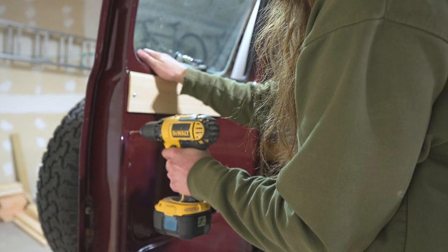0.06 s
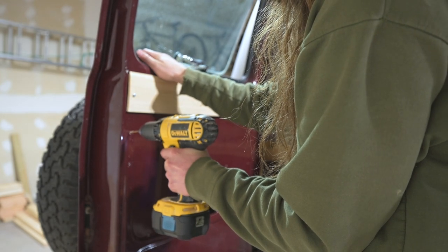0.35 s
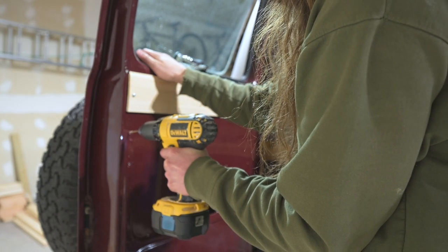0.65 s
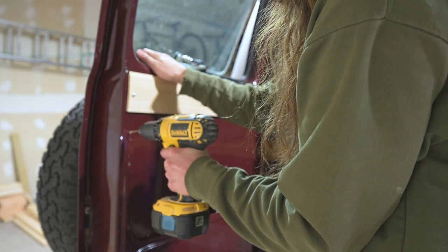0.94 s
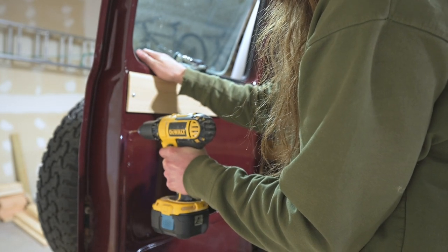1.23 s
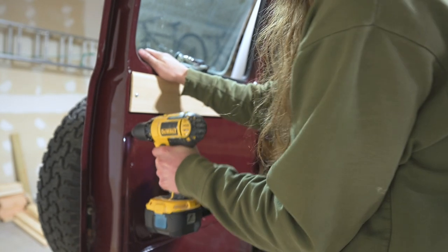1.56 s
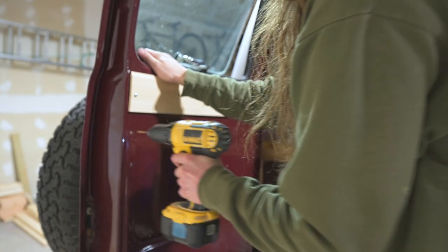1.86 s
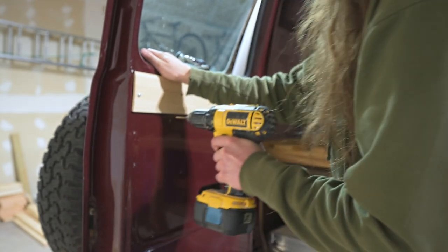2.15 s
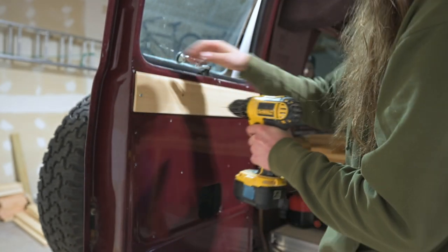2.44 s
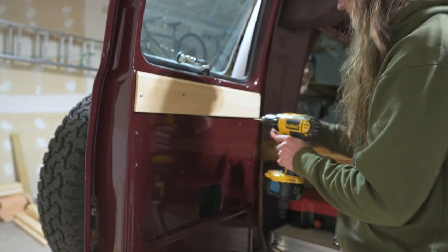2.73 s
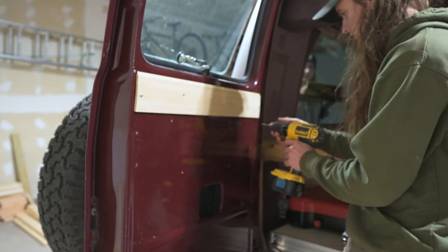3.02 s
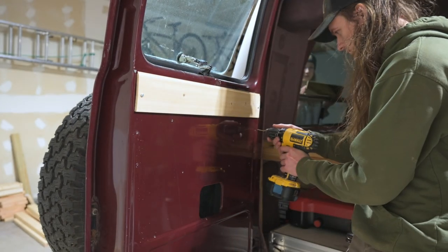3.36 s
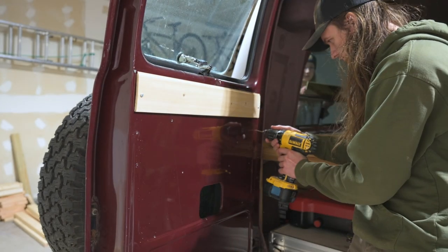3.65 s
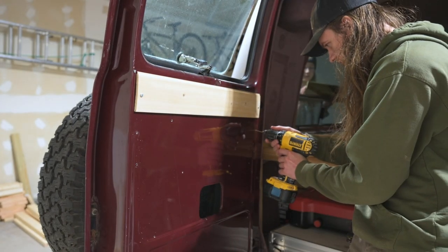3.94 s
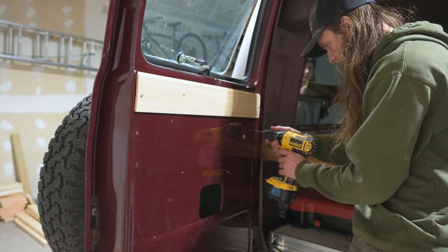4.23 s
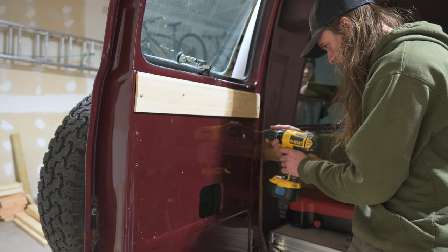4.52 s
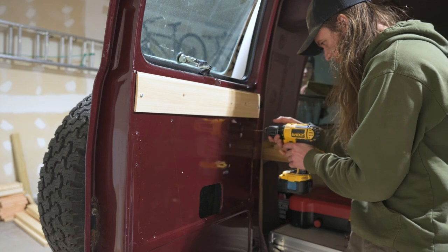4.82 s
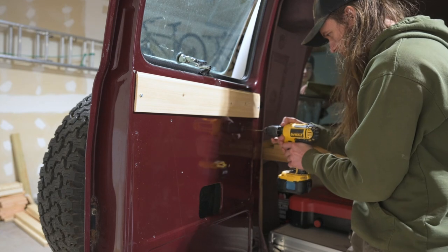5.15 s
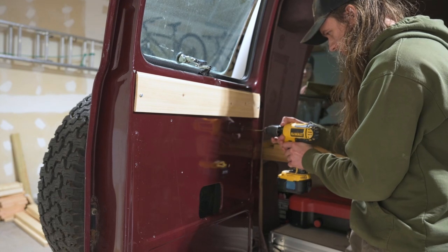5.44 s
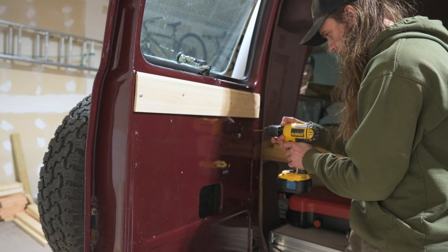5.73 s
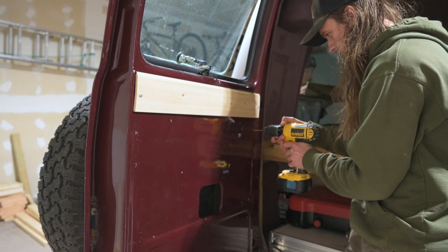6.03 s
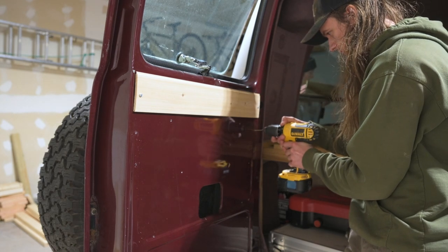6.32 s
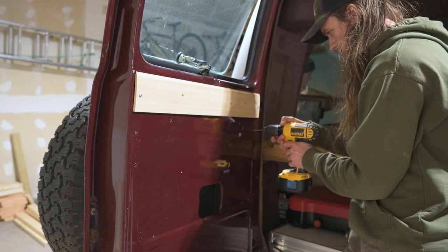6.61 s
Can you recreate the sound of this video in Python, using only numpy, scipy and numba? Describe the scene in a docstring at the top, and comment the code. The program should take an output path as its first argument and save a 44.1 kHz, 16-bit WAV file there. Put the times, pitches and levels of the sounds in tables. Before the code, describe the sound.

Two bursts of a cordless drill squealing and scraping through a metal van door, separated by light knocks and clicks.

```python
"""A cordless drill bores twice into the sheet-metal door of a van in a garage. Its motor and gears whine
over rattle and fan air. In the first hole the bit squeals and chatters through the panel, then the brake
clacks; in the second it scrapes on. Between the holes the door and its wooden trim are knocked and rubbed.
A limiter holds the loud drill down and lets the room's echo swell up when it stops."""
import sys
import numpy as np
from scipy import signal
from scipy.fft import rfft, irfft
from scipy.io import wavfile
from scipy.ndimage import uniform_filter1d
from numba import njit

SR = 44100
rng = np.random.default_rng(int(sys.argv[2]) if len(sys.argv) > 2 else 0)


def generate_wav(signal):
    """Clip the signal to [-1, 1] and save it as 16-bit WAV at the path in sys.argv[1]."""
    frames = np.transpose(np.atleast_2d(signal))
    scaled = np.clip(frames, -1, 1) * 32767
    pcm = np.round(scaled).astype(np.int16)
    wavfile.write(sys.argv[1], SR, pcm)


N = 298998
T = np.arange(N) / SR
HZ = np.maximum(np.arange(N // 2 + 1) * SR / N, 1)


def undb(db):
    """Turn decibels into a gain."""
    return 10 ** (np.asarray(db) / 20)


def unit(x):
    """Scale a sound to an average (rms) size of 1."""
    return x / np.sqrt(np.mean(x ** 2))


def over_hz(points, hz):
    """Read between (frequency, value) points, giving each octave equal room."""
    f, value = np.transpose(points)
    return np.interp(np.log(hz), np.log(f), value)


def shape(x, gain):
    """Give each frequency its own gain."""
    return irfft(rfft(x) * gain, N)


def band(x, low_hz, high_hz, order=2):
    """Keep what lies between two frequencies."""
    edges = [low_hz, min(high_hz, SR / 2 - 1)]
    return signal.sosfilt(signal.butter(order, edges, "band", fs=SR, output="sos"), x)


def convolve(x, response):
    """Let every sample of a sound set off the same echo or ring."""
    return signal.fftconvolve(x, response)[:N]


def noise(samples=N):
    """Plain white hiss."""
    return rng.standard_normal(samples)


def wobble(rate):
    """A random drift, about 1 in size, that turns rate times a second."""
    return 1.2 * np.interp(T * rate, np.arange(N), noise())


def gate(start, end):
    """On between two times, with 4 ms fades outside them."""
    return np.clip(1 + np.minimum(T - start, end - T) / .004, 0, 1)


def swells(rows):
    """A gain that rises to a peak and falls away for each row."""
    return sum(undb(db) * np.interp(T, [start, peak, end], [0, 1, 0]) for start, peak, end, db in rows)


def add(out, start, sound):
    """Mix a sound in at a given time."""
    i = int(start * SR)
    out[i:i + len(sound)] += sound[:N - i]


# the tone of the quiet garage: f/Hz, level/dB
ROOM_TONE = [(20, -17), (60, -4), (120, -3), (300, 3.5), (1000, -7), (3000, -13), (8000, -15), (15500, -22)]

def still_air(level_db=-53):
    """The faint, low hush of the room."""
    return undb(level_db) * unit(shape(noise(), undb(over_hz(ROOM_TONE, HZ))))


# how long the garage echoes: f/Hz, time to fade by 60 dB/s
ECHO_TIMES = [(60, 1.17), (250, 1.16), (1000, 1.02), (2500, 0.82), (5000, 0.6756), (8000, 0.44),
              (12000, 0.34), (16000, 0.56)]

def garage(x, echo_db=-6, gap_s=0.0048):
    """The walls add a wash of echoes whose high notes die first."""
    hz, t, spectrum = signal.stft(noise(2 * SR), SR, nperseg=256)
    decay = np.exp(-np.log(1000) * t / over_hz(ECHO_TIMES, hz + 1)[:, None])
    tail = signal.istft(spectrum * decay * np.clip(t / gap_s - 1, 0, 1), SR)[1]
    return x + undb(echo_db) * convolve(x, tail / np.sqrt(SR / np.log(1000) / 2))


# hand, sleeve and bit sliding on the door: start/s, peak/s, end/s, level/dB, f/Hz, width/Hz
DOOR_RUBS = [(2.535, 2.607, 2.7, -30.5, 1560, 3070), (2.583, 2.702, 3.05, -32, 1480, 3800),
             (2.704, 2.784, 2.94, -30, 557, 79.6), (2.605, 2.695, 2.9, -34, 132, 50),
             (2.993, 2.99, 3.27, -40, 3000, 3420), (4.28, 4.346, 4.43, -28.5, 560, 710),
             (4.293, 4.326, 4.35, -41, 4500, 3970), (4.647, 4.682, 4.83, -34.5, 1570, 2320),
             (4.829, 4.879, 4.92, -31, 1940, 2780), (4.902, 4.967, 5.05, -26.5, 3760, 3770),
             (4.905, 4.955, 5.13, -29, 990, 2230), (5.175, 5.184, 5.228, -6.5, 5550, 300),
             (5.192, 5.197, 5.245, -3, 1780, 200)]
# the door rumbling as it is let go and leaned on: same columns
DOOR_RUMBLES = [(2, 2.196, 2.18, -33, 60.5, 9.8), (3.712, 3.73, 4.7, -42, 110, 16),
                (3.747, 4.6, 5.6, -42.5, 62.4, 12)]

def rubs():
    """Each rub or rumble is noise around one pitch that swells and fades."""
    out = 0
    for start, peak, end, db, hz, width_hz in DOOR_RUBS + DOOR_RUMBLES:
        resonance = 1 / np.hypot(1, (HZ - hz ** 2 / HZ) / width_hz)
        treble_cut = 1 / np.hypot(1, (HZ / (4 * hz)) ** 2)
        friction = unit(shape(noise(), resonance * treble_cut))
        out = out + friction * swells([(start, peak, end, db)])
    return out


def ring(notes, detune=0.015, attack_s=0.0022):
    """A struck part rings with all its own notes, a little differently at each blow."""
    hz, db, fade_s = np.transpose(notes)[:, :, None]
    t, chance = T[:int(1.5 * SR)], rng.random((len(notes), 2))
    hz = hz * (1 + detune * (chance[:, :1] - .5))
    swing = np.sin(2 * np.pi * (hz * t + chance[:, 1:]))
    sound = np.sum(undb(db - 60 * t / fade_s) * swing, axis=0)
    return sound * np.minimum(t / attack_s, 1) / np.sqrt(np.sum(undb(db) ** 2) / 2)


# notes of the wooden trim, stiff door frame, broad door panel, and steel bit with its clamp (the chuck):
# f/Hz, level/dB, ring time/s
TRIM_NOTES = [(543, -4, 0.38), (610, -4, 0.44), (940, -3, 0.31), (1372, 6.5, 0.13), (1485, 6.5, 0.14),
              (1680, -1, 0.16), (2080, -9, 0.23), (2450, 5.5, 0.073), (3240, -5, 0.15), (4360, -2, 0.093)]
FRAME_NOTES = [(366, -16, 0.3), (603, -9, 0.42), (755, -4, 0.18), (864, 7, 0.11), (933, 7.5, 0.14),
               (1018, 2, 0.3), (1161, 1.5, 0.18), (1313, -0.5, .1), (1590, -11, 0.17), (2270, -9.5, 0.14),
               (2530, -18, 0.19), (3650, -13, 0.1), (3550, -13, 0.089)]
PANEL_NOTES = [(57.2, -14, 3.3), (61.7, -17, 1.4), (81.8, -10, 1.5), (112.9, -10.5, 1.3), (137, -3, 0.35),
               (142.4, -11.5, 0.33), (179.2, -2.5, 0.96), (197, 1, 0.3), (223.4, -8.5, 0.33),
               (251, -1, 0.32), (288.9, 1, 0.56), (355.6, -2, 0.23), (464, -16, 0.33)]
STEEL_NOTES = [(2500, -7, 0.17), (2840, -5, .18), (3120, -4, .15), (3540, 1, 0.11), (5879, -12, 0.079),
               (8839, -6, 0.088)]
# how a blow on each part spreads: into trim/dB, frame/dB, panel/dB, steel/dB
BLOW_SPREAD = {"trim": (1.5, -11, -16, -22), "frame": (-8.5, 3.5, -17.5, -20), "panel": (-9, -3, 0, -13),
               "chuck": (-10, -0.5, -16.5, -1.5)}
# the knocks: t/s, part struck, clack fade/s, clack level/dB, clack top f/Hz, ring level/dB
BLOWS = [(2.543, "trim", .008, -46, 6110, -36), (2.601, "trim", .018, -20.5, 4700, -16.5),
         (2.989, "panel", 0.024, -28, 1210, -35.5), (3.013, "panel", 0.02, -25, 4040, -40),
         (3.038, "panel", .0053, -34, 700, -35.5), (3.137, "chuck", 0.0025, -38.5, 11900, -62),
         (3.367, "panel", .018, -44.5, 2510, -40), (3.559, "panel", 0.024, -25, 1210, -37.5),
         (3.57, "frame", 0.09, -26.5, 1520, -22), (3.731, "panel", 0.015, -27.5, 3430, -34.5),
         (4.143, "frame", 0.015, -20, 3820, -17), (4.160, "frame", 0.013, -22, 3670, -15.5),
         (4.335, "frame", 0.013, -23, 920, -24.5), (4.377, "chuck", 0.013, -14.5, 4170, -18.5),
         (4.973, "chuck", 0.011, -23.5, 3130, -23), (5.137, "chuck", 0.006, -30, 4530, -42),
         (5.175, "chuck", 0.054, -13, 4570, -36)]

def knocks(tick_fade_s=0.0066, hard_hz=3700):
    """Each blow clacks, ticks if it is hard, and sets the struck part and its neighbours ringing."""
    out = np.zeros(N)
    parts = (TRIM_NOTES, FRAME_NOTES, PANEL_NOTES, STEEL_NOTES)
    for start, part, fade_s, clack_db, top_hz, ring_db in BLOWS:
        clack = unit(band(noise(SR), 250, top_hz, order=4)) * np.exp(-T[:SR] / fade_s)
        tick = unit(band(noise(SR), 3500, 11800)) * np.exp(-T[:SR] / tick_fade_s)
        hardness = undb(-11 + 30 * np.log10(top_hz / hard_hz))
        add(out, start, undb(clack_db) * (clack + hardness * tick))
        rings = sum(undb(ring_db + db) * ring(notes) for db, notes in zip(BLOW_SPREAD[part], parts))
        add(out, start, band(rings, 30, 2.2 * top_hz))  # a soft blow leaves the high notes quiet
    return out


# clacks of the chuck as the brake stops it: t/s, level/dB
BRAKE_CLACKS = [(1.971, 14.5), (1.987, 13), (1.994, 9.5), (2.012, 11.5), (2.02, 4.5), (2.035, -16)]

def brake(fade_s=0.0024):
    """The chuck's lock clacks a few times as the motor stops dead."""
    out = np.zeros(N)
    for start, db in BRAKE_CLACKS:
        add(out, start, undb(db) * np.exp(-T[:SR] / fade_s) * noise(SR))
    return band(band(out, 710, 11000), 349.4, 3100, order=1)


def cutting(start, end, bites, push_db, boom_hz, crunch_db, lean_s=0.32, catch_hz=64, heavy_db=-20):
    """The bit's edges catch unevenly and shake the panel; pushed hard, they tear it with a crunch."""
    load = undb(push_db) * np.clip((T - start) / lean_s, .05, 1) + swells(bites)
    since_catch = np.cumsum(catch_hz * (1 + .15 * wobble(60))) / SR % 1
    catches = noise() * np.exp(-since_catch / 0.46) * undb(1.3 * wobble(60))
    panel = ring(PANEL_NOTES)
    damped_panel = panel * np.exp(-5 * T[:len(panel)])
    boom = unit(band(convolve(catches, damped_panel), *boom_hz, order=3))
    grind = unit(band(catches, 220, 800))
    crunch = grind * undb(crunch_db) * (load / undb(heavy_db)) ** 0.84
    return (boom + crunch) * load * gate(start, end)


# squeals of the bit: grips/s, slips/s, settled f/Hz, level/dB
BIT_SQUEALS = [(-.1, 0.006, 5980, -19), (0.03, 0.082, 5750, -20.5), (0.113, 0.131, 5900, -17),
               (.155, .49, 5850, -20), (0.527, 0.573, 6070, -21), (0.668, 0.683, 5700, -24)]

def squeal(glide_s=0.014, sag_hz=750, fade_db=13, creep_hz=230, creep_s=0.055):
    """The dry bit sings: it slides up as it grips, creeps to its pitch, then sags and dies as it slips."""
    out = 0
    for grips, slips, settled_hz, db in BIT_SQUEALS:
        loose = np.clip(np.maximum(grips - T, T - slips) / glide_s, 0, 2)  # 0 gripping, 2 silent
        creep = np.exp(-np.maximum(T - grips, 0) / creep_s)
        hz = settled_hz - creep_hz * creep - sag_hz * loose
        waver = 1 + 0.0041 * wobble(400) + 0.00402 * wobble(18)
        angle = 2 * np.pi * np.cumsum(hz * waver) / SR
        level = undb(db - fade_db * loose + 0.69 * wobble(56.3)) * (loose < 2)
        out = out + np.sqrt(2) * level * np.sin(angle)
    return out


def motor(trigger, start_speed):
    """Turns per second: the heavy rotor lags behind each move of the trigger."""
    speed = np.full(N, float(start_speed))
    for start, aim, lag_s in trigger:
        i = int(start * SR)
        speed[i:] = aim + (speed[i] - aim) * np.exp(-T[:N - i] / lag_s)
    return speed


# spells when the chuck rattles harder: start/s, peak/s, end/s, level/dB
CHUCK_RATTLES = [(1.8, 1.88, 1.985, -24.5), (5.176, 5.2, 5.26, -20.5)]

def rattle_and_fan(angle, pace, colour, rattle_db, fan_rise_db, fan_db=-23, split_hz=3200):
    """Gear teeth clatter and the fan hisses above them; both pulse with each turn and grow with speed."""
    ripple_db = 1.23 * np.interp(HZ / 110, np.arange(N), noise())  # the plastic case's narrow resonances
    case = undb(over_hz(colour, HZ) + ripple_db)
    treble = 1 / (1 + (split_hz / HZ) ** 4)
    teeth = noise() * undb(1.3 * wobble(900)) * (1 + 0.2 * np.cos(angle))
    teeth = shape(teeth, case * np.sqrt(1 - treble))
    teeth /= np.std(band(teeth, 500, 3000, order=6))
    fan = noise() * undb(2 * wobble(1500)) * (1 + 0.02 * np.cos(angle))
    fan = shape(fan, case * np.sqrt(treble))
    fan /= np.std(band(fan, 6800, 15000, order=6))
    rattle = undb(rattle_db + 12 * pace) + swells(CHUCK_RATTLES)
    return rattle * teeth + undb(fan_db + fan_rise_db * pace) * fan


# pitches at which the gearbox rings: f/Hz, width/Hz, boost/dB
GEARBOX_PEAKS = [(1030, 290, 6.5), (2540, 160, 4), (2945, 440, 8.5), (3710, 250, 9.5), (4130, 260, 7.5),
                 (4470, 170, 13.5), (5303, 170, 14)]

def gearbox_db(hz):
    """A tone gets louder as it sweeps past one of the gearbox's own pitches."""
    return sum(db / (1 + (2 * (hz - f) / width) ** 2) for f, width, db in GEARBOX_PEAKS)


# the strong tones (shaft hum, whine, meshing gears, whine an octave up): multiple of the motor speed,
# level in hole 1/dB, in hole 2/dB, change per tenfold speed/dB, under strain/dB, once through/dB
MOTOR_TONES = [(1, -29, -34.5, 23.5, 4, -19), (7, -38.5, -36.5, -3.5, 11.5, -1.5),
               (12.58, -38.5, -46.5, 2.5, 33, -2), (14, -37, -36, 36, 0, -12)]
# speeds over which the whine fades in: from/(turns/s), to/(turns/s)
WHINE_ONSET = [33, 60]

def drill(hole, speed, through, overtones, colour, jerk, overtone_db, rattle_db, fan_rise_db):
    """One spinning shaft drives the whine, rattle and fan; speeding up strains the gears."""
    pace = np.log10(np.maximum(speed / speed.max(), .15))  # 0 at top speed, negative below it
    speeding_up = np.maximum(np.gradient(speed) * SR, 0)
    strain = jerk * np.tanh(speeding_up / 1900)  # levels off past 1900 turns/s gained each second
    waver = 1 + 0.00093 * wobble(70) + 0.000607 * wobble(6)
    angle = 2 * np.pi * np.cumsum(speed * waver) / SR
    tones = []
    for multiple, first_db, second_db, rise_db, strain_db, through_db in MOTOR_TONES:
        base_db = first_db if hole == 1 else second_db
        change_db = rise_db * pace + strain_db * strain + through_db * through
        tones.append((multiple, base_db + change_db + gearbox_db(multiple * speed)))
    # the overtones only come out near top speed
    tones += [(multiple, overtone_db + db + 40 * pace) for multiple, db in overtones]
    whine = sum(undb(db + 1.36 * wobble(25)) * np.sin(multiple * angle) for multiple, db in tones)
    whine *= np.sqrt(2) * np.interp(speed, WHINE_ONSET, [0, 1])
    return whine + rattle_and_fan(angle, pace, colour, rattle_db, fan_rise_db)


# moves of the trigger: t/s, speed aimed at/(turns/s), lag/s
FIRST_TRIGGER = [(0, 280, .27), (.55, 303.7, .125), (1.08, 370.7, .066), (1.6, 380, .16), (1.93, 0, .4)]
# the motor's weaker tones: multiple of its speed, level/dB
FIRST_OVERTONES = [(2, -20.5), (2.38, -19), (3, -17), (8, -35), (11, -16), (16, -29), (17, -9), (20, -28),
                   (22, -10.5), (23, -12.5), (24, -28), (28, -32), (30, -20)]
# tone colour of the rattle and fan: f/Hz, level/dB
FIRST_COLOUR = [(60, -28), (130, -48), (220, -14.5), (480, -13), (800, -12), (1300, -9), (2100, -9),
                (2900, -10), (3900, -3), (5000, -5.5), (6100, -3), (7400, -5), (10100, -4), (12000, -13),
                (15500, -21)]
# the bit biting deeper: start/s, peak/s, end/s, level/dB
FIRST_BITES = [(1.194, 1.29, 1.33, -32.5), (1.52, 1.542, 1.71, -24), (1.559, 1.64, 1.744, -17),
               (1.693, 1.753, 1.95, -21.5)]

def first_hole(start=0, end=1.97, through_s=1.52, freeing_s=.15):
    """The trigger is squeezed gently in stages; the bit squeals, then tears through and runs free."""
    speed = motor(FIRST_TRIGGER, start_speed=160)
    through = np.clip((T - through_s) / freeing_s, 0, 1)
    tool = drill(hole=1, speed=speed, through=through, overtones=FIRST_OVERTONES, colour=FIRST_COLOUR,
                 jerk=0.26, overtone_db=-22.5, rattle_db=-27.5, fan_rise_db=6)
    squeals = squeal()
    cut = cutting(start, end, FIRST_BITES, push_db=-37.5, boom_hz=(91, 337), crunch_db=-6)
    return tool * gate(start, end) + squeals + cut


# the same four tables for the second hole, with the same columns
SECOND_TRIGGER = [(5.172, 140, .09), (5.225, 380.2, .072), (6.07, 340, 2.3)]
SECOND_OVERTONES = [(2, -9.5), (5, -22), (8, -15), (13, -27), (15, -13), (16, -5.5), (17, -6), (20, -30),
                    (24, -15)]
SECOND_COLOUR = [(60, -36), (130, -25), (200, -6), (310, -18), (480, -10), (850, -7), (1100, -8.5),
                 (1700, -1.5), (2150, -6.5), (2500, -1.5), (3000, -3.5), (4200, 0), (6000, -3),
                 (7500, -1.5), (9700, -2.5), (12000, -10.5), (15500, -19.5)]
SECOND_BITES = [(5.19, 5.22, 4, -37), (5.413, 5.46, 5.62, -38), (5.657, 5.7, 5.95, -38),
                (6.043, 6.157, 6.3, -35), (6.216, 6.55, 7, -34)]

def second_hole():
    """The trigger is pulled right in and the bit scrapes on without coming through."""
    start, end = SECOND_TRIGGER[0][0], T[-1]
    speed = motor(SECOND_TRIGGER, start_speed=20)
    tool = drill(hole=2, speed=speed, through=0, overtones=SECOND_OVERTONES, colour=SECOND_COLOUR,
                 jerk=0.73, overtone_db=-23, rattle_db=-24, fan_rise_db=12.5)
    cut = cutting(start, end, SECOND_BITES, push_db=-41, boom_hz=(95, 209), crunch_db=0)
    return tool * gate(start, end) + cut


# how much the microphone's left and right openings differ: f/Hz, level/dB
STEREO_SPREAD = [(1400, -66), (2800, -43), (4000, -30), (5600, -22), (9000, -15.5), (14000, -18)]

def scene(drill_db=12):
    """Both holes and the handling between them, heard in the garage from two points close together."""
    hush = still_air()
    drilling = undb(drill_db) * (first_hole() + second_hole())
    middle = garage(drilling + brake() + knocks() + rubs()) + hush
    scatter = noise(2048) / np.sqrt(2048)
    side = shape(convolve(middle, scatter), undb(over_hz(STEREO_SPREAD, HZ)))
    return np.array([middle + side, middle - side])


@njit
def hold(x, release):
    """Follow rises at once and let go slowly."""
    out, held = np.empty(len(x)), 0.
    for i in range(len(x)):
        held = max(x[i], held + (x[i] - held) * release)
        out[i] = held
    return out


def record(dry, ceiling_db=-16.5, release_s=0.063, window_s=0.033, top_hz=15850):
    """A limiter turns the sound down when it passes the ceiling; then the highest treble is cut."""
    power = uniform_filter1d(dry[0] ** 2, int(window_s * SR))
    excess_db = 10 * np.log10(np.maximum(power / undb(ceiling_db) ** 2, 1))
    limited = dry * undb(-hold(excess_db, 1 / (release_s * SR)))
    return signal.sosfilt(signal.ellip(12, .1, 90, top_hz, fs=SR, output="sos"), limited)


dry = scene()
out = record(dry)
generate_wav(out)
```